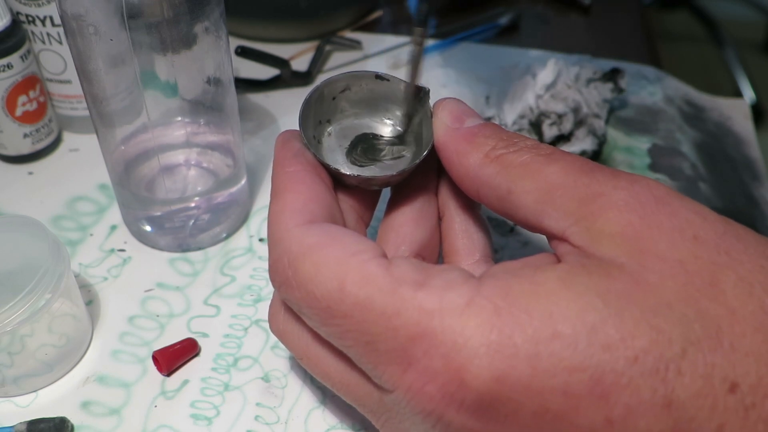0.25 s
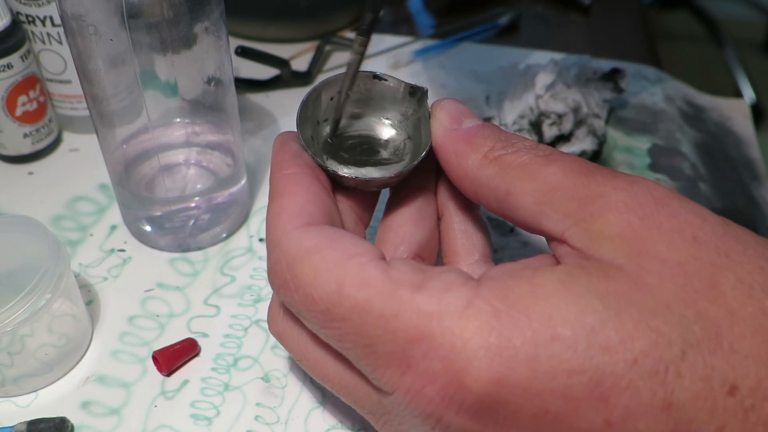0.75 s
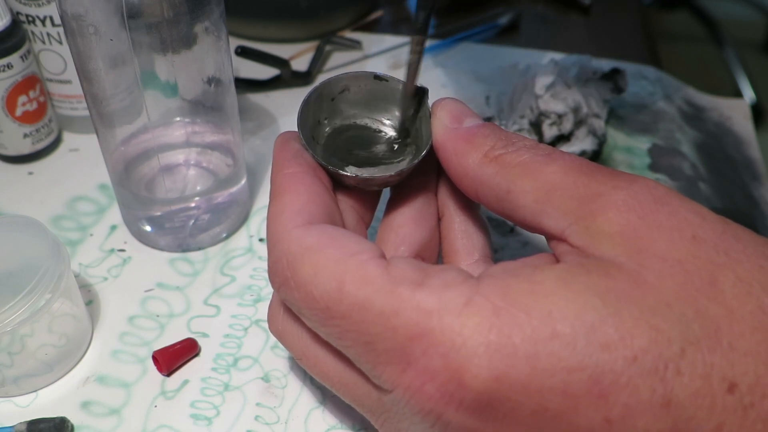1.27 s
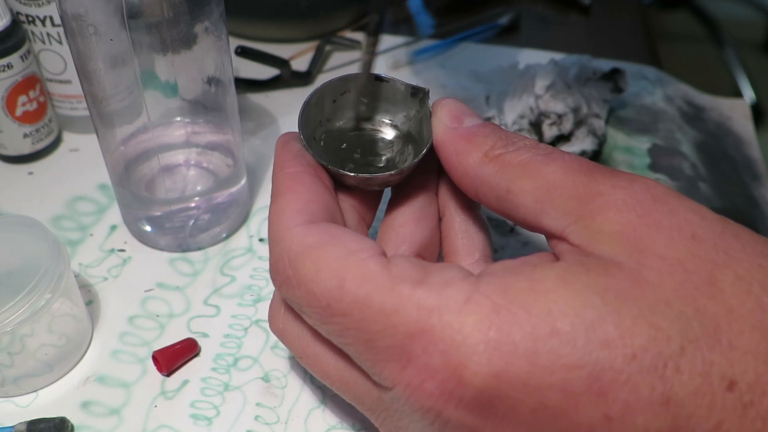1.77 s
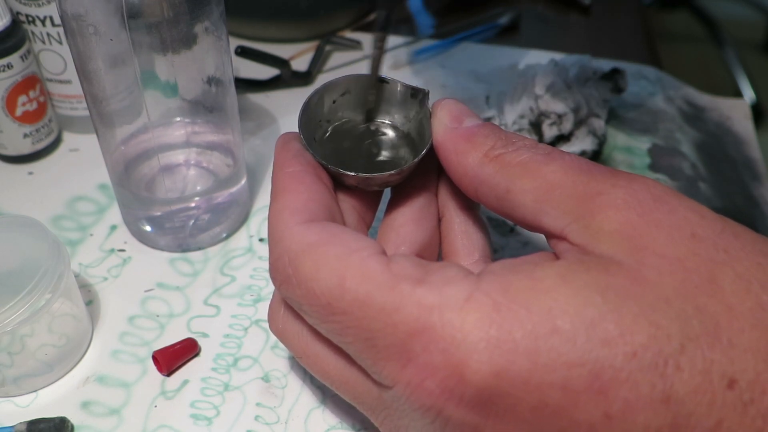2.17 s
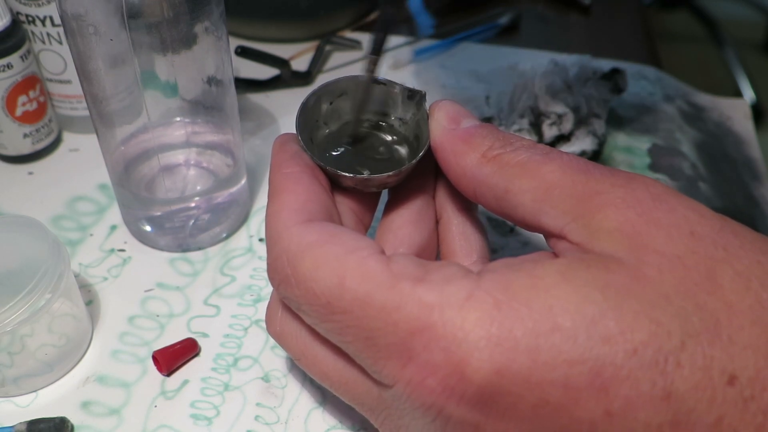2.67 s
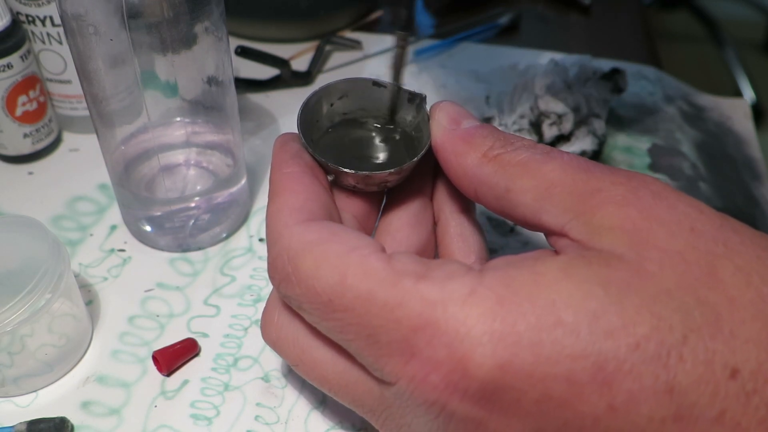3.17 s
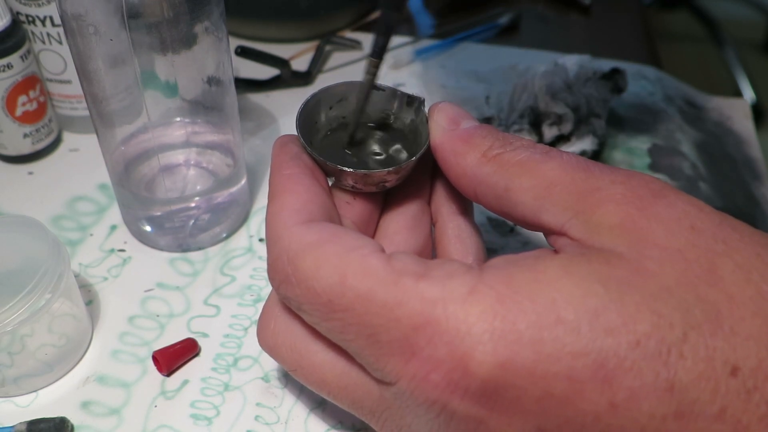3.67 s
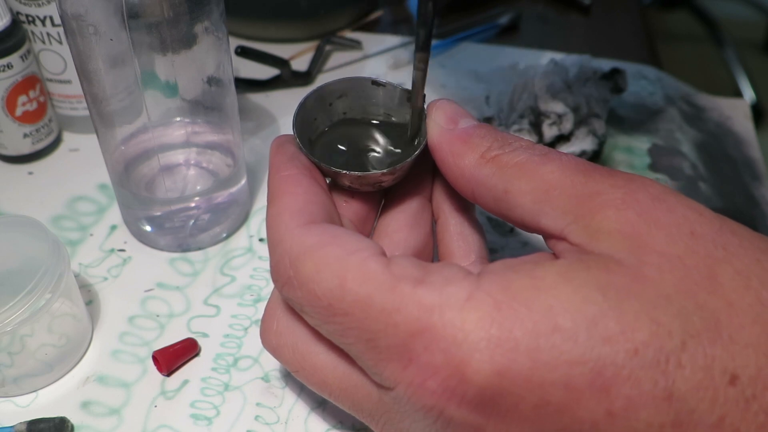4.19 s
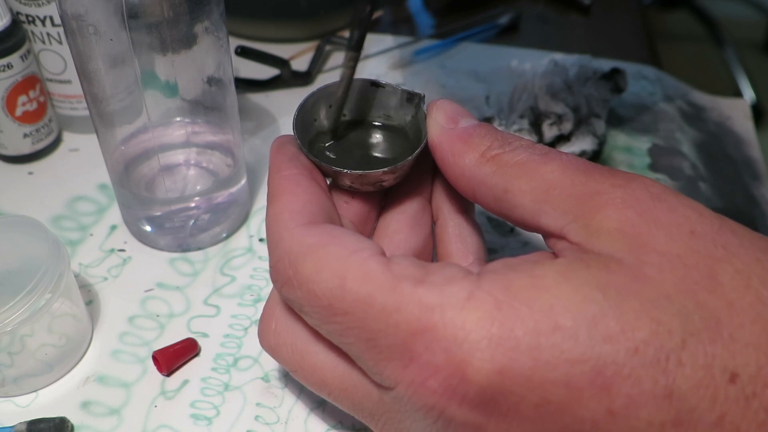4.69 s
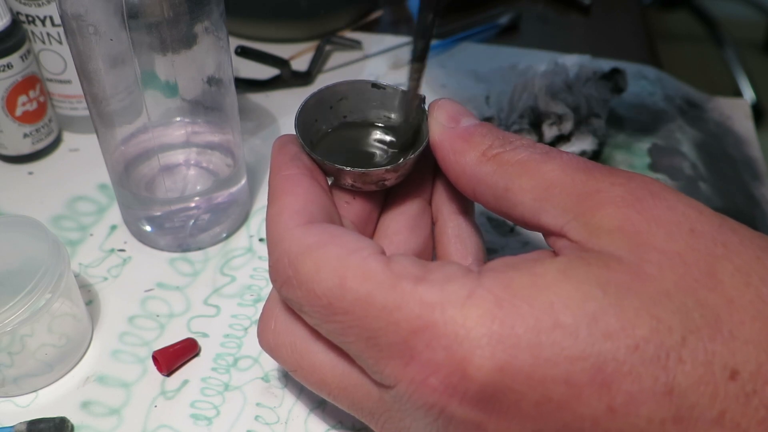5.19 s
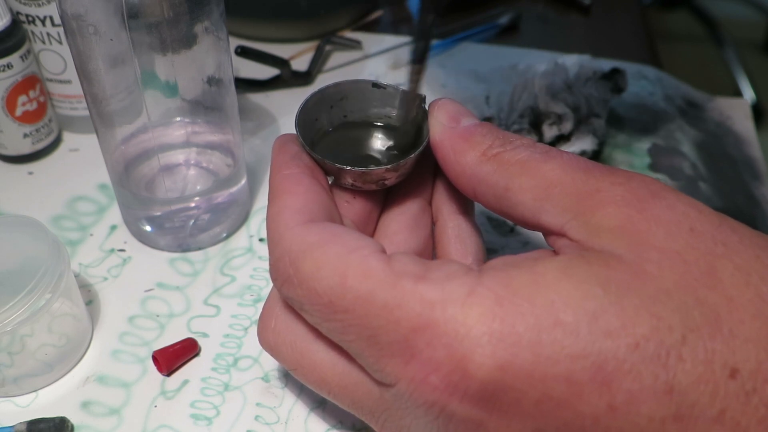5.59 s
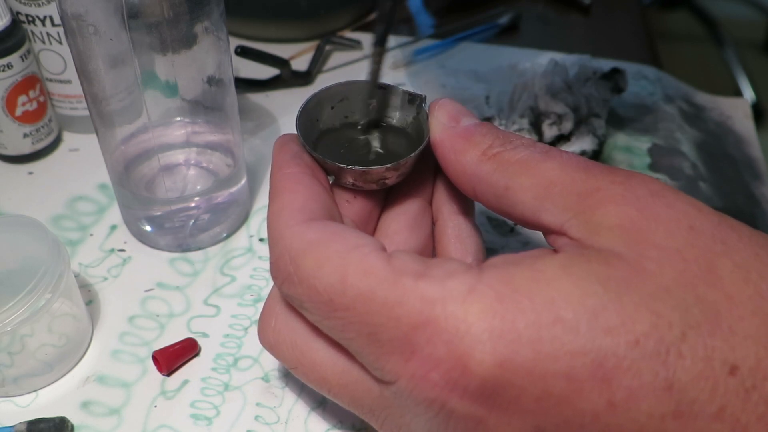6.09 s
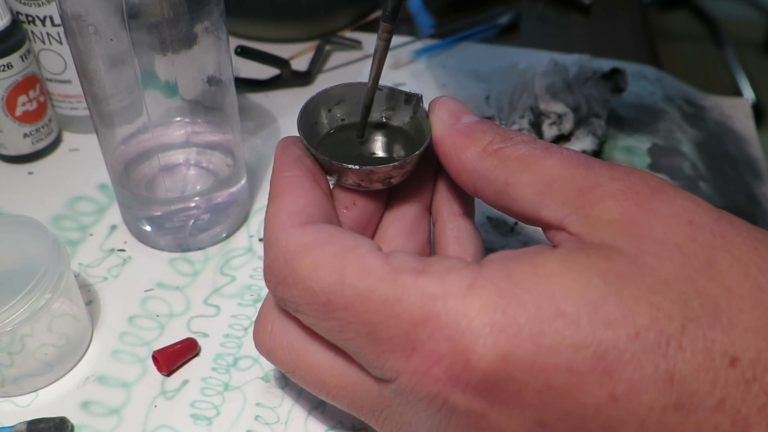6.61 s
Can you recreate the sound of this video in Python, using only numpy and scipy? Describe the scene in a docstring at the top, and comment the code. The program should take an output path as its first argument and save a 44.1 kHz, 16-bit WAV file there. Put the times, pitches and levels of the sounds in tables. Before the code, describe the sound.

A wet paintbrush stirs paint in a small metal cup, with quick, light hissing scrapes and small ticks.

```python
"""Wet bristles hiss and scrape round a small metal cup, about five turns a second, close up in stereo.
A paintbrush is stirring thinned paint: on each turn the bristles sweep the bottom, then on most the
ferrule rasps along the wall. Now and then it ticks against the wall; once it sticks and squeaks.
Fingers damp the cup, so its resonances are broad and short. Behind it is the faint air of a quiet room."""
import sys
import numpy as np
from scipy import signal
from scipy.fft import rfft, irfft
from scipy.io import wavfile
from scipy.ndimage import uniform_filter1d

SR = 44100
rng = np.random.default_rng(int(sys.argv[2]) if len(sys.argv) > 2 else 0)


def log_audio(samples):
    """Write samples as a 16-bit WAV file to the path given in sys.argv[1]."""
    # one column per channel
    frames = np.atleast_2d(samples).T
    # limit to full scale, then quantise
    limited = np.clip(frames, -1, 1)
    pcm = np.round(limited * 32767).astype(np.int16)
    wavfile.write(sys.argv[1], SR, pcm)


N = 302085


def from_db(db):
    """Decibels to gain."""
    return 10 ** (np.asarray(db) / 20)


def unit_power(x):
    """Scale each channel to unit power."""
    return x / np.sqrt(np.mean(x ** 2, axis=-1, keepdims=True) + 1e-20)


def at_hz(points, hz):
    """Read a table on a log-frequency axis."""
    freq_hz, value = np.transpose(points)
    return np.interp(np.log(np.maximum(hz, 1)), np.log(freq_hz), value)


def coloured(x, spectrum):
    """Filter by a spectrum table; unit power."""
    size = x.shape[-1]
    gain = from_db(at_hz(spectrum, np.fft.rfftfreq(size, 1 / SR)))
    return unit_power(irfft(rfft(x) * gain, size))


def resonance(x, hz, width_hz):
    """One resonator, applied twice for steep skirts; unit power."""
    r = np.exp(-np.pi * width_hz * np.pi / 2 / SR)
    b, a = [1, 0, -1.3], [1, -2 * r * np.cos(2 * np.pi * hz / SR), r * r]
    return unit_power(signal.lfilter(b, a, signal.lfilter(b, a, x)))


def burst(x, envelope):
    """Shape a short sound; the envelope alone sets its energy."""
    return unit_power(x * envelope) * np.sqrt(np.mean(envelope ** 2))


def panned(x, pan_db):
    """Tilt a stereo pair left by pan_db."""
    return x * from_db([[pan_db / 2], [-pan_db / 2]])


def add(out, start_s, sound):
    """Mix a sound in at start_s."""
    i = max(round(start_s * SR), 0)
    part = sound[:, :max(N - i, 0)]
    out[:, i:i + part.shape[1]] += part


def contact_time(length_s=0.4):
    """Time axis of one contact."""
    return np.arange(round(length_s * SR)) / SR


# freq_hz, level_db
AIR_SPECTRUM = [(40, -56), (100, -20), (180, -11.5), (300, -4.5), (500, 0), (1400, -1.5), (2200, -2.5),
                (2750, -2.5), (4500, -5), (12000, -15), (15500, -27)]
# freq_hz, left_right_correlation
AIR_CORRELATION = [(60, -0.17), (200, -0.65), (400, -0.7), (750, -.45), (1300, 0), (2500, 0.72),
                   (8000, 0.64), (15000, -0.11)]


def room_air(mid_db=-70, hum_hz=121.5, hum_db=-104):
    """Steady, wide room noise with a trace of mains hum."""
    correlation = np.clip(at_hz(AIR_CORRELATION, np.fft.rfftfreq(N, 1 / SR)), -0.9, 0.9)
    mid, side = (coloured(rng.standard_normal(N), AIR_SPECTRUM) for _ in range(2))
    side = irfft(rfft(side) * np.sqrt((1 - correlation) / (1 + correlation)), N)
    hum = from_db(hum_db) * np.sqrt(2) * np.sin(2 * np.pi * hum_hz * np.arange(N) / SR)
    return from_db(mid_db) * np.array([mid + side, mid - side]) + hum


def room_tail(x, t60_s=0.059, level_db=-10, delay_s=0.004):
    """Short, diffuse reflections from desk and walls, unrelated in the two channels."""
    t = contact_time()
    tail = rng.standard_normal((2, len(t))) * from_db(-60 * t / t60_s) * (t > delay_s)
    tail /= np.sqrt(np.sum(tail ** 2, axis=1, keepdims=True))
    return from_db(level_db) * signal.fftconvolve(x, tail, axes=1)[:, :N]


# mode_hz, relative_db
CUP_MODES = [(2750, 0), (3345, 11.5), (3745, -10), (4880, 7), (5700, -4.5), (7670, 3.5), (12900, -4)]


def cup_ring(contacts, width_hz=80, gain_db=-18):
    """The contacts plus the cup's modes, which ring on for a few hundredths of a second."""
    out, r = contacts, np.exp(-np.pi * width_hz / SR)
    for mode_hz, relative_db in CUP_MODES:
        drive = contacts + 1e-12 * rng.standard_normal(N)
        poles = [1, -2 * r * np.cos(2 * np.pi * mode_hz / SR), r * r]
        mode = signal.lfilter([1, 0, -1], poles, drive)
        out = out + from_db(relative_db + gain_db) * (1 - r * r) / 2 * mode
    return out


def cup_scatter(x, scatter_db, spread, decay_s=0.0012):
    """Sound bounces inside the cup, anew for each contact; spread (0..1) sets left and right apart."""
    t = contact_time()[:SR // 250]
    shared, left, right = rng.standard_normal((3, len(t))) * np.exp(-t / decay_s)
    paths = np.sqrt(1 - spread) * shared + np.sqrt(spread) * np.array([left, right])
    paths *= from_db(scatter_db) / np.sqrt(np.sum(paths ** 2, axis=1, keepdims=True))
    paths[:, 0] = 1   # direct path
    return signal.fftconvolve(x[None], paths, axes=1)[:, :len(x)]


# freq_hz, level_db
WALL_SPECTRUM = [(500, -30.5), (1600, -7), (2100, -7.5), (2650, 1), (3900, 3), (4400, 0), (4950, 3),
                 (5700, 1.5), (7500, -9)]


def cup_wall(drive, wall_hz, ring_db):
    """The damped wall answers broadly, with one resonance set by the point of contact."""
    ring = from_db(ring_db) * resonance(drive, wall_hz, width_hz=420)
    return unit_power(coloured(drive, WALL_SPECTRUM) + ring)


# start_s, level_db
NUDGES = [(6.314, -51.5), (6.608, -58.5)]


def nudges(pitch_hz=2770, t60_s=0.045):
    """A soft touch sounds only the cup's lowest mode: a faint, short, rough note."""
    out, t = np.zeros((2, N)), contact_time()
    for start_s, level_db in NUDGES:
        note = resonance(rng.standard_normal(len(t)), pitch_hz, width_hz=170)
        add(out, start_s, (from_db(level_db - 60 * t / t60_s) * note)[None])
    return out


# time_s, pitch_hz, level_db
SQUEAK_PATH = [(2.858, 4260, -66), (2.889, 3730, -50), (2.903, 3730, -72)]


def ferrule_squeak(width_hz=260, release_s=0.003):
    """Stick and slip: a rough, narrow tone that slides down."""
    time_s, pitch_hz, level_db = np.transpose(SQUEAK_PATH)
    out, t = np.zeros((2, N)), time_s[0] + contact_time()
    tone = resonance(rng.standard_normal(len(t)), pitch_hz[0], width_hz)
    glide = np.exp(2j * np.pi * np.cumsum(np.interp(t, time_s, pitch_hz) - pitch_hz[0]) / SR)
    release = np.exp(-np.maximum(t - time_s[-1], 0) / release_s)
    envelope = from_db(np.interp(t, time_s, level_db)) * release
    add(out, time_s[0], (np.real(signal.hilbert(tone) * glide) * envelope)[None])
    return out


# Ferrule on metal, in ticks and scrapes: freq_hz, level_db
FERRULE_SPECTRUM = [(800, -59), (3500, -25), (5500, -13.5), (7000, -8), (8000, -5), (9300, -4.5),
                    (11000, 0.5), (12000, 4), (13200, -6.5), (14500, -1), (15800, -21)]
# start_s, crack_relative_db, wall_relative_db, wall_hz
TICKS = [(0.1658, -47.5, -52.5, 3470), (0.3904, -34.5, -31, 3360), (1.3487, -30.5, -68, 4960),
         (1.5415, -36.5, -45.5, 5030), (2.72, -27.5, -54, 4370), (2.9139, -32, -45, 5270),
         (3.447, -44, -54, 4030), (3.5332, -48.5, -54, 5720), (4.516, -32, -67, 5500),
         (5.3022, -48, -55.5, 7040), (5.663, -40, -43, 6260)]


def ferrule_ticks(attack_s=0.0003, decay_s=0.0022, gain_db=5.0):
    """The ferrule strikes the wall: a brief crack and a ring that the fingers stop at once."""
    out, t = np.zeros((2, N)), contact_time()
    attack, decay = 1 - np.exp(-t / attack_s), np.exp(-t / decay_s)
    for start_s, crack_db, wall_db, wall_hz in TICKS:
        contact = cup_scatter(rng.standard_normal(len(t)), scatter_db=9.0, spread=0.89)
        crack = from_db(crack_db) * burst(coloured(contact, FERRULE_SPECTRUM), decay)
        ring = from_db(wall_db) * burst(cup_wall(contact, wall_hz, ring_db=4.5), decay)
        add(out, start_s, (crack + panned(ring, pan_db=-1.5)) * attack)
    return from_db(gain_db) * out


def friction(slips_per_s, spread_db, clump_db, snaps_per_s=70, snap_db=14.5):
    """Tiny slips of uneven size, clumped over a few milliseconds, with the odd sharper snap."""
    size = len(contact_time())
    clumps = unit_power(uniform_filter1d(rng.standard_normal(size), size=180))
    strengths = from_db(spread_db * np.minimum(rng.exponential(1, size), 4) + clump_db * clumps)
    slips = unit_power(strengths * (rng.random(size) < slips_per_s / SR))
    snaps = from_db(snap_db) * rng.uniform(0.38, 1.6, size) * (rng.random(size) < snaps_per_s / SR)
    return (slips + snaps) * rng.choice([-1, 1], size)


def scrape_pressure(t, start_s, push_db, rise_db=9, landing_db=-15, landing_s=0.00094):
    """The ferrule lands with a tiny click, presses harder, then lets go."""
    rise_s = 0.022 * from_db(0.46 * push_db)   # longer when pushed harder
    fall_db_per_s = 357 + 15.5 * start_s   # later scrapes let go faster
    pressure_db = rise_db * np.minimum(t / rise_s - 1, 0) - fall_db_per_s * np.maximum(t - rise_s, 0)
    return from_db(pressure_db) + from_db(landing_db) * np.exp(-t / landing_s)


# Air in the cup: freq_hz, level_db
HOLLOW_SPECTRUM = [(300, -51), (1000, -10.5), (1330, 10), (1600, -7.5), (1900, -16.5), (5000, -9)]


def ferrule_scrape(start_s, push_db, hollow_db, wall_db, wall_hz, rasp_db=-41, wall_per_push=1.23):
    """The ferrule rasps along the wall, driving the metal and the air in the cup."""
    slips = friction(slips_per_s=5200, spread_db=2.5, clump_db=-1.0)
    rasp_drive = cup_scatter(slips, scatter_db=11.0, spread=1.0)
    body_drive = cup_scatter(slips, scatter_db=1.5, spread=0.27)
    rasp = from_db(rasp_db + push_db) * coloured(rasp_drive, FERRULE_SPECTRUM)
    hollow = from_db(hollow_db) * coloured(body_drive, HOLLOW_SPECTRUM)
    wall = cup_wall(body_drive, wall_hz, ring_db=-17.5)
    body = from_db(wall_db + wall_per_push * push_db) * (wall + hollow)
    return (rasp + panned(body, pan_db=1.5)) * scrape_pressure(contact_time(), start_s, push_db)


def sweep_pressure_db(t, length_s, lift_s=0.01, lift_db=5):
    """Bristle pressure sets in fast, swells to mid-sweep, lifts just before the wall and dies away."""
    attack_db_per_s, swell_db_per_s, release_db_per_s = 901.5, 200, 285
    hold_s = max(length_s - lift_s, 0.004)
    attack = attack_db_per_s * np.minimum(t, 0)
    swell = -swell_db_per_s * abs(np.clip(t, 0, hold_s) - hold_s / 2)
    lift = lift_db * np.clip((t - hold_s) / lift_s, 0, 1)
    release = release_db_per_s * np.maximum(t - hold_s, 0)
    return attack + swell - lift - release


# freq_hz, level_db
BRISTLE_SPECTRUM = [(800, -48), (3800, -25), (5100, -26.5), (6400, -14.5), (7700, -22.5), (9300, -15.5),
                    (10100, -7), (10900, 4), (11900, 1), (12600, -8.5), (13500, 0.5), (15800, -17)]


def bristle_sweep(pressure_db, whistle_hz, whistle_db=-1.5, drop_hz=326.5, sizzle_db=1.0):
    """Wet bristles start as a thin whistle; under pressure it sinks and opens into a broad sizzle."""
    slips = friction(slips_per_s=12000, spread_db=2.0, clump_db=3.0)
    drive = cup_scatter(slips, scatter_db=3.5, spread=1.0)
    sizzle = coloured(drive, BRISTLE_SPECTRUM) * from_db(sizzle_db + 1.2 * pressure_db)
    tone = resonance(drive, whistle_hz, width_hz=150)
    glide = np.exp(-2j * np.pi * np.cumsum(drop_hz * from_db(pressure_db)) / SR)
    whistle = np.real(signal.hilbert(tone) * glide) * from_db(whistle_db + pressure_db)
    return sizzle + whistle


# time_s, whistle_hz, sweep_pan_db, hollow_re_wall_db, firm_scrape_wall_db, wall_hz
BRUSH_DRIFT = [(0.1, 11000, 1, -7.5, -52.5, 3260), (0.8, 10850, -2, -7, -46, 5050),
               (1.5, 11100, -3, -12.5, -56.5, 4750), (3.3, 11570, -5, -19, -50, 2600),
               (4.3, 11700, -2.5, -38, -55.5, 2620), (5.7, 12100, -2, -14, -52.5, 5820),
               (6.5, 11600, -2.5, -26, -55.5, 4050)]


def brush_place(time_s):
    """The brush drifts slowly about the cup; its place colours each stroke."""
    times_s, *columns = np.transpose(BRUSH_DRIFT)
    return [np.interp(time_s, times_s, column) for column in columns]


# sweep_end_s, sweep_length_s, sweep_db, push_re_firm_scrape_db (None: ferrule stays clear)
STROKES = [(0.121, 0.022, -51, -5), (0.345, 0.014, -57, -4.5), (0.397, 0.014, -44.5, 1),
           (0.578, 0.017, -45.5, -5.5), (0.774, 0.019, -45.5, -4.5), (0.959, 0.013, -49, -2.5),
           (1.147, 0.009, -47.5, 1), (1.332, 0.013, -54, 1.5), (1.53, 0.02, -50, 3.5),
           (1.735, 0.029, -46.5, None), (1.955, 0.061, -47, -2), (2.161, 0.084, -45.5, None),
           (2.346, 0.092, -46, None), (2.521, 0.078, -39.5, None), (2.70, 0.035, -48, 1),
           (2.886, .02, -41.5, 2), (3.071, 0.061, -53, 0.5), (3.103, 0.021, -41.5, None),
           (3.129, 0.008, -67, -7.5), (3.266, .07, -59, -1.5), (3.451, .056, -58.5, -3.5),
           (3.483, 0.017, -41.5, None), (3.657, .054, -56.5, -2.5), (3.719, .01, -73, -4.5),
           (3.873, 0.024, -64, -5.5), (3.908, .01, -64, -3.5), (4.098, 0.053, -44, 2.5),
           (4.306, .042, -46.5, -1), (4.502, 0.047, -44, -8.5), (4.688, 0.039, -42, -0.5),
           (4.876, 0.028, -43.5, 5), (5.093, 0.044, -48, -3), (5.161, 0.023, -48.5, None),
           (5.275, 0.061, -38, None), (5.477, 0.065, -36, -1), (5.668, 0.049, -39.5, 2),
           (5.874, 0.055, -39, 1), (6.064, .044, -45.5, 3), (6.248, 0.03, -46.5, None),
           (6.462, 0.049, -47.5, 0), (6.601, 0.094, -54, None)]


def stirring(lead_s=0.05):
    """Each stroke sweeps the bottom; where the ferrule then meets the wall, it scrapes."""
    out, t = np.zeros((2, N)), contact_time()
    for end_s, length_s, sweep_db, _ in STROKES:
        whistle_hz, pan_db, *_ = brush_place(end_s)
        sweep = bristle_sweep(sweep_pressure_db(t - lead_s, length_s), whistle_hz)
        add(out, end_s - length_s - lead_s, panned(sweep, pan_db) * from_db(sweep_db))
    for end_s, _, _, push_db in STROKES:
        if push_db is not None:
            _, _, hollow_db, wall_db, wall_hz = brush_place(end_s)
            add(out, end_s, ferrule_scrape(end_s, push_db, hollow_db, wall_db, wall_hz))
    return out


def scene():
    """Brush and cup, their reflections, and the room air."""
    cup = cup_ring(stirring() + ferrule_ticks()) + ferrule_squeak() + nudges()
    return cup + room_tail(cup) + room_air()


def record(dry):
    """Steep low-pass on the top treble."""
    cutoff_hz = 15750
    return signal.sosfilt(signal.ellip(12, 0.1, 80, cutoff_hz, fs=SR, output="sos"), dry)


dry = scene()
out = record(dry)
log_audio(out)
```